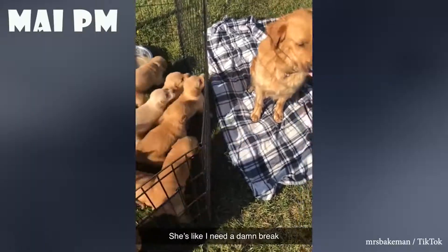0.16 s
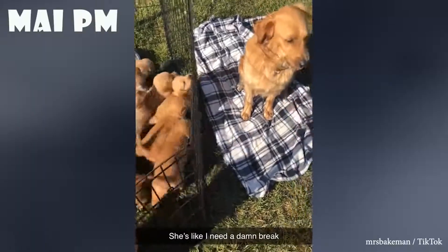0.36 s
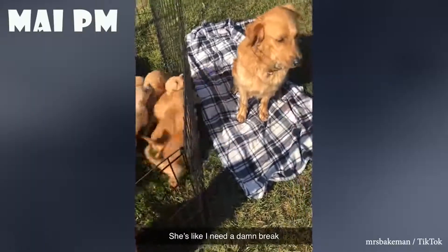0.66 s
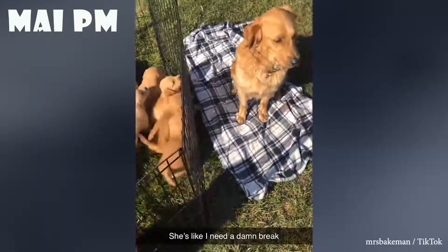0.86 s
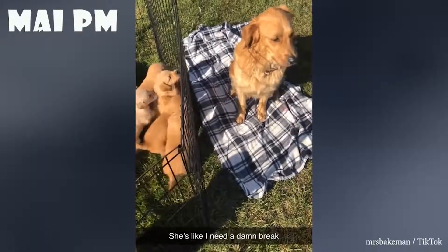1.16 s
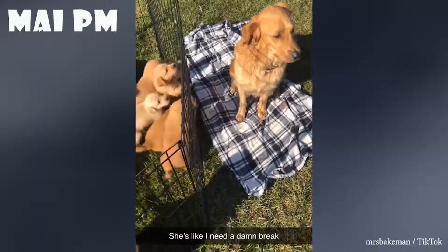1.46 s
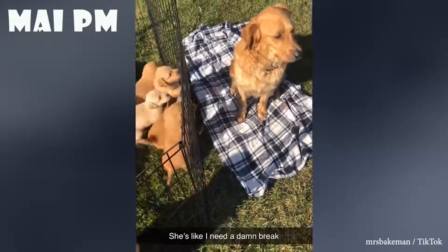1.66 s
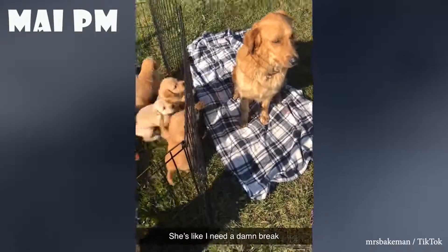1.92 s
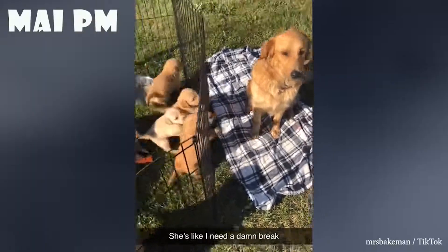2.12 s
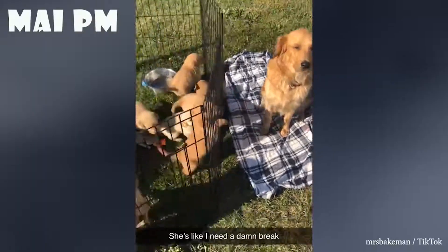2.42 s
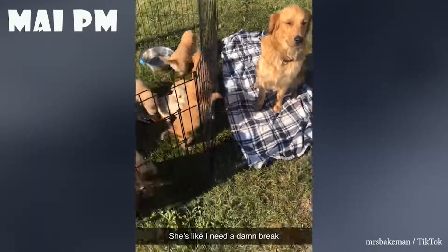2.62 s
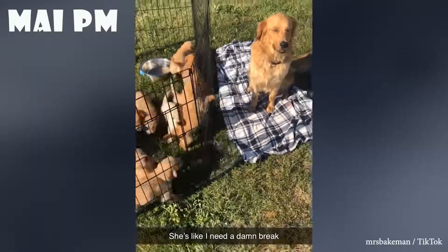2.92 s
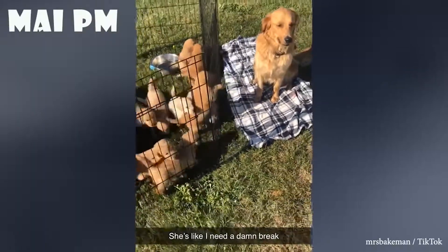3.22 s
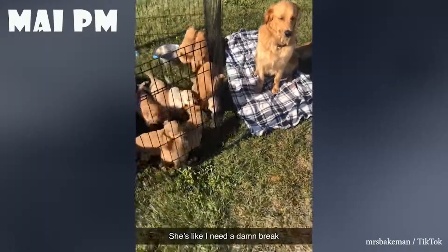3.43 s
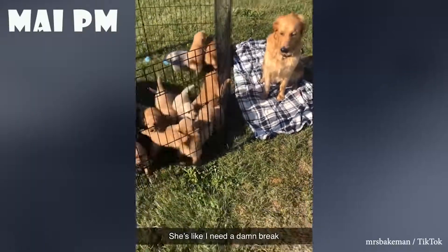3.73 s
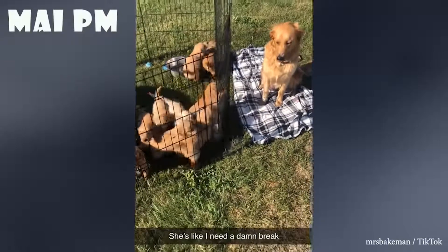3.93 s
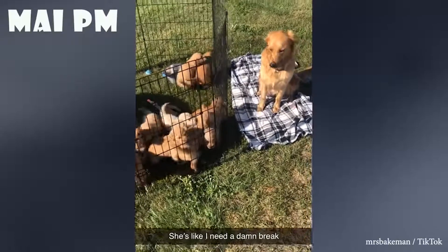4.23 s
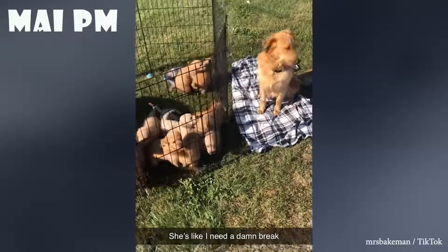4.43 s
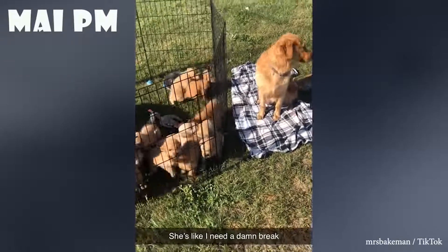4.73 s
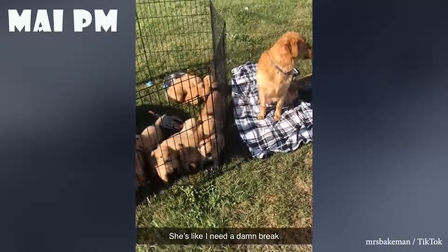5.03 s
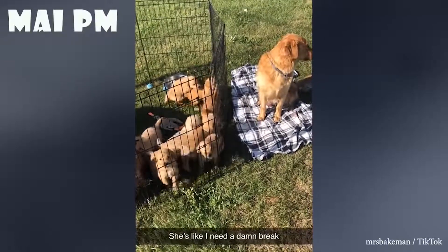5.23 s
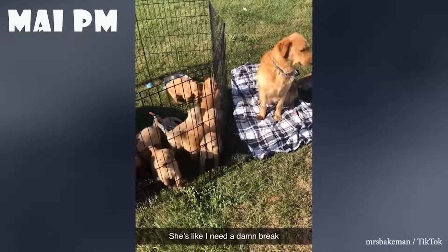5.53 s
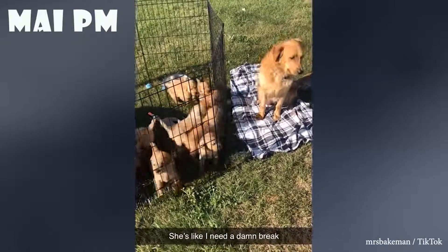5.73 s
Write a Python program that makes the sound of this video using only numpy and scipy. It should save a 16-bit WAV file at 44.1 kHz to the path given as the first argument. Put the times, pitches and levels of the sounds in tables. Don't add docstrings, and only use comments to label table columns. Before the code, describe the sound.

A litter of young puppies whines and squeaks in overlapping high arches outdoors, with light wind on the microphone and a late close dog snort.

```python
import sys
import numpy as np
from scipy import signal
from scipy.io import wavfile
from scipy.ndimage import uniform_filter1d

SR = 44100
rng = np.random.default_rng(int(sys.argv[2]) if len(sys.argv) > 2 else 0)


def volts_from_decibels(level):
    exponent = np.asarray(level, float) / 20
    return 10 ** exponent


def to_wav(s):
    ch = np.atleast_2d(s).T
    pcm = np.round(np.clip(ch, -1, 1) * 32767)
    wavfile.write(sys.argv[1], SR, pcm.astype(np.int16))


N = 258778

# frequency in Hz, density in dB per Hz.
AIR_SPECTRUM = [(120, -10.5), (200, -12.5), (781, -9), (1210, -13), (1660, -16), (2110, -15), (2560, -24),
                (4100, -23), (7000, -29), (13000, -34)]
AIR_DB = -49
# time in seconds, level in dB.
GUSTS = [(0.0, -55), (0.05, -32), (0.29, -42), (0.85, -34.5), (0.93, -52.5), (1.11, -39.5), (1.73, -31.5),
         (2.06, -56), (2.35, -40), (2.45, -56), (2.92, -31), (3.01, -52.5), (4.79, -58), (4.85, -31),
         (4.98, -45), (5.1, -32.5), (5.51, -52.5), (5.87, -46.5)]
# start in seconds, length in seconds, pitch in Hz, level in dB.
BIRD_CHIPS = [
    (0.133, 0.033, 8140, -31.5),
    (2.739, 0.056, 8300, -34),
    (2.809, 0.066, 8200, -34.5),
    (5.582, 0.07, 9430, -41),
    (5.628, 0.088, 7940, -40),
]
# time in seconds, level in dB.
NOSE_BURST = [
    (5.777, -56),
    (5.793, -20.5),
    (5.808, -21),
    (5.868, -28),
]
# time in seconds, treble change in dB.
PHONE_FACING = [
    (.45, 3),
    (.68, 13.5),
    (.75, -8),
    (.95, 3.5),
    (2.3, 3),
    (2.6, -16.5),
    (3.9, -10),
    (4.15, 4.5),
    (4.55, -5.5),
    (4.75, 2),
]

# frequency in Hz, gain in dB.
THROAT_COLOUR = [(2100, 1), (2600, -25.5), (3300, -1), (4000, 0.5), (5000, -4), (6500, -10.5),
                 (8500, -11.5), (10000, -13), (13000, -23)]
# resonance in Hz, width in Hz, gain in dB.
RASP_RESONANCES = [(1250, 530, 7), (1810, 610, 9.5), (4160, 1570, 6.5), (4720, 2200, 2.5)]
# start in seconds, length in seconds, level in dB, slap rate in Hz.
RASP_BREAKS = [(0.754, 0.04, -38, 480), (1.446, 0.035, -39, 500), (1.918, 0.105, -30.5, 590),
               (2.542, 0.045, -30, 510), (2.912, 0.08, -35, 560), (3.03, 0.14, -45, 530),
               (3.335, 0.1, -35.5, 610), (5.652, 0.07, -46, 460), (4.548, .022, -41, 500),
               (4.4, .09, -47, 420), (2.85, .04, -43, 500), (3.69, .04, -42, 600)]

# time in seconds, pitch in Hz, effort in dB.
NEAREST_CRIES = [
    [(.898, 1657, -53), (.94, 1860, -50), (1.075, 1538, -32.5), (1.205, 1340, -48), (1.227, 958, -31)],
    [(2.158, 1075, -72), (2.2, 1172, -21.5), (2.23, 1343, -19.5), (2.269, 1528, -30), (2.365, 1415, -32),
     (2.478, 1272, -33.5)],
    [(2.547, 1008, -30.5), (2.595, 1121, -23), (2.64, 1351, -15.5), (2.67, 1436, -23.5), (2.769, 1275, -22),
     (2.835, 1338, -40.5)],
    [(3.017, 989, -49.5), (3.068, 1057, -25.5), (3.134, 1466, -33), (3.263, 1358, -44.5),
     (3.307, 1430, -44)],
    [(3.658, 988, -37.5), (3.712, 1250, -16), (3.798, 1402, -34.5), (3.84, 1290, -35.5), (3.867, 1076, -34)],
    [(4.49, 900, -55), (4.529, 1130, -32), (4.55, 1247, -29), (4.6, 1423, -40)],
    [(4.59, 1415, -40), (4.65, 1535, -40.5), (4.72, 1648, -34), (4.78, 1636, -35), (4.91, 1356, -42),
     (4.948, 1040, -49)],
    [(4.858, 793, -51), (4.9, 999, -42.5), (5.041, 1195, -32.5), (5.124, 1098, -38), (5.28, 951, -43),
     (5.298, 742, -40.5)],
]
NEAREST_MOUTHS_DB = [-20.5, -17, -10.5, -7.5, -18.5, -2, -6.5, -26]
NEAREST_TILTS_DB = [-8, -4, -2, 2, -4.5, -6.5, -5.5, -6]
# time in seconds, pitch in Hz, effort in dB.
FURTHER_CRIES = [
    [(0, 1466, -23), (.04, 1330, -28.5), (.127, 1366, -32.5), (.144, 1163, -22)],
    [(.248, 952.4, -33), (.329, 1334, -30), (.35, 1413, -30), (.491, 1382, -33.5), (.569, 1237, -47),
     (.59, 1030, -35)],
    [(.44, 1083, -41), (.479, 1381, -26), (.533, 1464, -30), (.641, 1420, -34), (.659, 1180, -25)],
    [(.88, 998, -37.5), (.949, 1249, -36), (.979, 1259, -28.5), (1.093, 1354, -27), (1.182, 1278, -34.5),
     (1.209, 1200, -33)],
    [(1.269, 940, -40), (1.326, 1336, -35.5), (1.359, 1357, -34.5), (1.404, 1520, -28.5),
     (1.47, 1628, -39.5), (1.559, 1588, -37)],
    [(2.029, 1460, -40.5), (2.098, 1563, -42), (2.26, 1614, -46), (2.33, 1387, -43), (2.45, 1360, -43)],
    [(3.307, 952, -49.5), (3.352, 1219, -31), (3.397, 1312, -26.5), (3.445, 1404, -44)],
    [(3.52, 1012, -40), (3.55, 1080, -26), (3.601, 1400, -29), (3.652, 1323, -33.5), (3.718, 1375, -32)],
]
FURTHER_MOUTHS_DB = [-26, -27, -16, -21, -22.5, -5, -9, -15.5]
FURTHER_TILTS_DB = [0.5, 1.5, 1.5, -5, 4, -1.5, -17, -4.5]
# time in seconds, pitch in Hz, effort in dB.
SHARP_CRIES = [
    [(.829, 1046, -42), (.862, 1226, -28.5), (.935, 1585, -28), (.95, 1545, -28), (1.005, 1463, -32),
     (1.02, 1250, -34)],
    [(4.158, 1508, -45), (4.229, 1492, -37), (4.271, 1619, -47), (4.31, 1378, -36), (4.337, 1040, -41)],
    [(5.127, 1071, -35.5), (5.262, 1236, -32), (5.325, 1208, -35.5), (5.39, 1110, -38)],
    [(5.349, 1006, -57), (5.367, 1076, -32.5), (5.442, 1420, -24.5), (5.51, 1295, -26.5),
     (5.528, 1096, -28)],
    [(1.778, 998, -44.5), (1.832, 1218, -24), (1.889, 1599, -31.5), (1.94, 1560, -25.5), (1.999, 1396, -37)],
]
SHARP_MOUTHS_DB = [-17, -18, -21.5, -17.5, -25]
SHARP_TILTS_DB = [1.3, 1.57, 1.7, 4.2, 2]
# time in seconds, pitch in Hz, effort in dB.
FAINTER_CRIES = [
    [(3.95, 854, -56), (4.0, 1050, -45.5), (4.05, 1230, -42)],
    [(4.015, 893, -50), (4.06, 1047, -37.5), (4.1, 1170, -38), (4.16, 1150, -39), (4.2, 975, -43.5),
     (4.215, 903, -40)],
    [(4.04, 1015, -49), (4.09, 1287, -38.5), (4.13, 1500, -39), (4.165, 1560, -43)],
    [(1.96, 1250, -43), (2.0, 1412, -33.5), (2.03, 1614, -36), (2.065, 1580, -55)],
    [(5.615, 298, -46), (5.65, 375, -45.5), (5.69, 463, -42)],
    [(.32, 1170, -49), (.37, 1293, -47), (.45, 1318, -45), (.52, 1284, -44), (.58, 1170, -45)],
    [(3.73, 1025, -46), (3.8, 1109, -45), (3.9, 1118, -43), (3.935, 994, -44)],
]
FAINTER_MOUTHS_DB = [-7.5, -14.5, -7.5, -2.5, -21, -13.5, -9.5]
FAINTER_TILTS_DB = [-1, -8, -4, -6, -7, 0, 6]

# start in seconds, climb in seconds, sag in seconds, top pitch in Hz, effort in dB.
WIDE_CALLS = [
    (2.93, 0.048, 0.074, 1410, -47),
    (3.72, 0.075, .15, 1500, -47.5),
    (3.8, 0.052, 0, 1500, -59),
    (5.63, 0.06, 0.12, 940, -48),
    (1.3, .04, 0.047, 1158, -53),
    (2.45, .07, 0.076, 1046, -46.5),
    (3.308, 0.042, 0.018, 1173, -41),
]
# start, climb and sag in seconds, top pitch in Hz, effort in dB.
OPEN_CALLS = [ (.15, 0.096, 0.052, 1290, -38), (1.018, 0.0016, 0.073, 1760, -43),
              (1.38, 0.17, 0.18, 1572, -35.5), (1.449, 0.086, 0.14, 1364, -48.5),
              (1.64, 0.031, 0.11, 1503, -39.5), (2.649, 0.062, 0.046, 1152, -35.5),
              (2.73, 0.023, 0.096, 1570, -40), (2.778, 0.048, 0.058, 1120, -39.5),
              (2.84, 0, .11, 1192, -37.5), (2.9, 0.043, 0.029, 1250, -39),
              (3.358, 0.091, 0.086, 1178, -40.5), (3.445, 0.048, 0.044, 967, -40),
              (3.747, 0, 0.11, 1230, -43), (5.01, 0.06, 0.085, 1406, -34), (4.15, 0.048, 0.033, 1235, -33),
              (1.03, 0.083, 0, 1364, -31.5), (4.409, 0.068, 0.027, 1216, -34.5),
              (4.678, 0.048, 0.1, 1317, -35), (5.715, 0.12, 0.16, 1357, -30.5)]
# start, climb and sag in seconds, top pitch in Hz, effort in dB.
HALF_CALLS = [ (.709, 0.15, 0.09, 1537, -33), (.769, 0.02, 0.023, 1270, -30),
              (1.218, 0.096, 0.094, 1627, -32), (1.539, 0.035, .09, 1558, -29.5),
              (1.91, 0.088, 0.0014, 1329, -25), (2.029, 0.00062, 0.034, 1250, -26),
              (2.029, 0.0071, 0.068, 1320, -43.5), (2.278, 0.05, 0.017, 1312, -37.5),
              (2.41, 0.11, 0.054, 1258, -38.5), (3.08, 0.094, 0.027, 869, -40),
              (4.038, 0.049, 0.011, 1207, -28), (4.17, 0.036, 0.0098, 1249, -33.5),
              (4.358, 0.07, 0.028, 1392, -39.5)]
# start, climb and sag in seconds, top pitch in Hz, effort in dB.
SHUT_CALLS = [ (0, 0.014, 0.084, 1242, -37.5), (.3, 0, 0.062, 900, -44), (.198, 0.027, 0.057, 1100, -39),
              (.389, 0.07, 0.0091, 1345, -33), (.518, 0.064, 0.12, 1073, -40),
              (.87, 0.017, 0.036, 685, -46), (.935, 0, 0.04, 675, -48), (.65, 0.045, 0.0012, 1450, -37),
              (1.149, 0, 0.021, 1250, -25), (1.329, 0.039, 0.029, 1053, -38),
              (1.559, 0.049, 0.012, 1173, -33.5), (1.607, 0.072, 0, 1053, -34.5),
              (2.107, 0.17, 0.015, 1504, -30.5), (2.209, 0.00086, 0.034, 1215, -28.5),
              (2.38, 0, 0.0164, 1435, -18), (3.759, 0.011, 0.042, 914, -42),
              (3.978, 0.13, .05, 1490, -43.5), (4.559, 0.036, 0.15, 1165, -36.5),
              (5.439, 0.063, .033, 970, -50.5), (5.55, 0.075, 0.007, 722, -41.5),
              (5.537, 0.082, 0.027, 1504, -43)]
WIDE_DB, OPEN_DB, HALF_DB, SHUT_DB = -4, -15, -21, -28.5
CLIMB_SHARE, CLIMB_S, CLIMB_BEND = 0.42, 0.09, 1.5
SAG_PER_S, SLUMP_SHARE, SLUMP_S = 0.65, 0.171, 0.023
ONSET_DB, ONSET_S, TIRE_DB_PER_S = -11, 0.023, -19.5
NOSE_HZ, NOSE_WIDTH_HZ, NOSE_DB = 1304, 136, 5
# start in seconds, length in seconds, pitch in Hz, level in dB.
FALLING_YELPS = [
    (1.148, 0.018, 1000, -51),
    (1.206, 0.022, 1110, -42),
    (2.046, 0.02, 1140, -43),
    (2.381, 0.02, 1230, -38),
    (2.436, 0.013, 1350, -28),
    (2.484, 0.0225, 1200, -42),
    (4.287, .03, 1570, -40.5),
    (1.658, .02, 1130, -43),
    (.078, 0.02, 1200, -38.5),
]
YELP_FALL, YELP_MOUTH_DB, YELP_TILT_DB = 0.2, -17, -11


def evened(x):
    return x / np.sqrt(np.mean(x ** 2) + 1e-20)


def read(points, hz):
    f, value = np.transpose(points)
    return np.interp(np.log(hz + 1), np.log(f + 1), value)


def add(mix, s, sound):
    part = mix[max(round(s * SR), 0):][:len(sound)]
    part += sound[:len(part)]


def band(x, lo_hz, hi_hz):
    return signal.sosfilt(signal.butter(2, [lo_hz, hi_hz], "band", fs=SR, output="sos"), x)


def smooth2d(x, rows, columns):
    return uniform_filter1d(uniform_filter1d(x, size=rows, axis=0), size=columns, axis=1)


def drift(count, size):
    return evened(uniform_filter1d(uniform_filter1d(rng.standard_normal(count), size), size))


def resonate(x, hz, width_hz):
    b, a = signal.iirpeak(hz, hz / width_hz, fs=SR)
    return signal.lfilter(b, a, signal.lfilter(b, a, x))


def air():
    frames, hz = N // 256 + 5, np.fft.rfftfreq(1024, 1 / SR)
    gust_db = np.interp(np.arange(frames) * 256 / SR, *np.transpose(GUSTS))
    real, imaginary, patches = rng.standard_normal((frames, 513, 3)).T
    patches = evened(smooth2d(patches, 14, 12))
    level_db = read(AIR_SPECTRUM, hz)[:, None] + 5.5 * patches - 0.15 * gust_db
    z = (real + 1j * imaginary) * volts_from_decibels(level_db)
    return volts_from_decibels(AIR_DB) * evened(signal.istft(z, nperseg=1024, noverlap=768)[1][:N])


def wind():
    noise = rng.standard_normal(N)
    flap = band(band(noise, 47, 131), 47, 131)
    rumble = evened(band(noise, 35, 70)) + volts_from_decibels(-13) * evened(flap)
    gust_db = np.interp(np.arange(N) / SR, *np.transpose(GUSTS))
    return volts_from_decibels(gust_db + 4.44 * drift(N, size=1300)) * evened(rumble)


def chip(length, hz, db):
    t = np.arange(round(length * SR)) / SR
    glide = hz * (1 + 0.127 * np.exp(-t / 0.0048) + 0.5 * t)
    return volts_from_decibels(db) * np.sin(2 * np.pi * np.cumsum(glide) / SR) * signal.windows.tukey(len(t), 0.4)


def bird():
    out = np.zeros(N)
    for s, length, hz, db in BIRD_CHIPS:
        add(out, s, chip(length, hz, db))
    return out


def snort():
    out, t = np.zeros(N), np.arange(5000) / SR
    turn = 2 * np.pi * np.cumsum(262 + 40 * np.exp(-t / 0.01)) / SR
    swell = np.exp(-(t / 0.02) ** 2) + 0.24 * np.exp(-((t - 0.06) / 0.021) ** 2)
    swell = np.minimum(t / 0.013, 1) * swell
    add(out, 5.75, volts_from_decibels(-12) * swell * (np.sin(turn) + 0.16 * np.sin(2 * turn)))
    s, db = np.transpose(NOSE_BURST)
    noise = rng.standard_normal(N) * volts_from_decibels(2.3 * drift(N, size=60))
    nose = band(noise, 2930, 10400) + 2.66 * band(noise, 300, 780)
    nose += 0.52 * band(noise, 1720, 3300) + 2 * resonate(noise, 5390, 410)
    return out + volts_from_decibels(np.interp(np.arange(N) / SR, s, db, left=-120)) * evened(nose)


def murmur():
    out = np.zeros(N)
    for s, hz, length, db in rng.uniform([0, 850, 0.03, -56], [5.7, 1350, 0.09, -47], (45, 4)):
        rows = [(s, hz, db), (s + length / 2, 1.1 * hz, db), (s + length, 0.8 * hz, db)]
        add(out, s, whine(rows, -19, -5))
    return out


def ground_echo(litter):
    scatter = rng.standard_normal(4000) * volts_from_decibels(-60 * np.arange(4000) / SR / 0.1)
    return volts_from_decibels(-21) * signal.oaconvolve(litter, scatter / np.linalg.norm(scatter))[:N]


def rasp(length, db, slap_hz):
    count = round(length * SR)
    rate = slap_hz * (1 + 0.6 * np.arange(count) / SR + 0.035 * drift(count, size=70))
    turn = 2 * np.pi * np.cumsum(rate) / SR
    slaps = sum(volts_from_decibels(4 * drift(count, size=500)) * np.cos(k * turn + k * k) for k in range(1, 12))
    puffs = (evened(slaps) + 0.7 * rng.standard_normal(count)) * volts_from_decibels(3 * drift(count, size=120))
    throat = sum(volts_from_decibels(gain_db) * resonate(puffs, hz, width_hz) for hz, width_hz, gain_db in RASP_RESONANCES)
    rough = band(band(throat + 0.027 * puffs, 330, 6000), 290, 6000)
    return volts_from_decibels(db) * evened(rough) * np.hanning(count) ** 0.8


def break_voices(litter):
    for s, length, db, slap_hz in RASP_BREAKS:
        voiced = litter[round(s * SR):][:round(length * SR)]
        smear = 0.3 * voiced * drift(len(voiced), size=50) * np.hanning(len(voiced))
        add(litter, s, rasp(length, db, slap_hz) + smear)


def arch(start, climb, sag, top_hz, effort_db):
    climb, sag = max(climb, 0), max(sag, 0)
    t = np.linspace(0, climb + sag, num=40)
    to_top = np.clip(1 - t / (climb + 1e-9), 0, 1)
    below = CLIMB_SHARE * (1 - np.exp(-climb / CLIMB_S)) * to_top ** CLIMB_BEND
    after = np.maximum(t - climb, 0)
    at_end = np.exp(-((climb + sag - t) / SLUMP_S) ** 2 * 2)
    slump = SLUMP_SHARE * np.minimum(after / SLUMP_S, 1) * at_end
    hz = top_hz * (1 - below - SAG_PER_S * after - slump)
    ring_db = NOSE_DB * np.exp(-((hz - NOSE_HZ) / NOSE_WIDTH_HZ) ** 2)
    effort_db = effort_db + ring_db + ONSET_DB * np.exp(-t / ONSET_S) + TIRE_DB_PER_S * t
    return np.transpose([start + t, hz, effort_db])


def whine(rows, mouth_db, tilt_db, fade_s=0.013):
    s, hz, effort_db = np.transpose(rows)
    t = np.arange(s[0], s[-1], 1 / SR)
    hz = uniform_filter1d(np.interp(t, s, hz), size=450, mode="nearest")
    hz = hz * (1 + 0.0047 * drift(len(t), size=300))
    effort_db = np.interp(t, s, effort_db) + 1.51 * drift(len(t), size=250)
    mouth_db = mouth_db + 2.6 * np.linspace(1, -1, len(t)) + 0.063 * (effort_db - effort_db.mean())
    turn = 2 * np.pi * (np.cumsum(hz) / SR + rng.random())
    facing_db = np.interp(t, *np.transpose(PHONE_FACING))
    climb_db = np.clip(np.gradient(hz) * SR / 400, 0, 12)
    voice = np.cos(turn)
    for k in range(2, 11):
        flutter_db = (2 + 0.3 * k) * drift(len(t), size=700)
        top = np.clip((k * hz - 6000) / 1500, 0, 1)
        dull_db = top * (0.31 * (mouth_db + 7) - facing_db + climb_db)
        dull_db -= (1 - top) * tilt_db * min(k - 3, 2)
        level_db = mouth_db + read(THROAT_COLOUR, k * hz) - dull_db + flutter_db
        voice += volts_from_decibels(level_db) * np.cos(k * turn + k * k + 0.03 * k * drift(len(t), size=120))
    hiss_db = -27 + 5 * drift(len(t), size=1500) + facing_db - 0.3 * (effort_db + 30)
    nasal_hiss = volts_from_decibels(hiss_db) * band(rng.standard_normal(len(t)), 4270, 12500)
    hoarse_edge = volts_from_decibels(mouth_db - 12) * band(rng.standard_normal(len(t)), 1700, 6000)
    fade = np.clip(np.minimum(t - s[0], s[-1] - t) / fade_s, 0, 1)
    return np.sqrt(2) * volts_from_decibels(effort_db) * fade * (voice + nasal_hiss + hoarse_edge)


def chorus():
    out = murmur()
    for cries, mouths_db, tilts_db in ((NEAREST_CRIES, NEAREST_MOUTHS_DB, NEAREST_TILTS_DB),
                                       (FURTHER_CRIES, FURTHER_MOUTHS_DB, FURTHER_TILTS_DB),
                                       (SHARP_CRIES, SHARP_MOUTHS_DB, SHARP_TILTS_DB),
                                       (FAINTER_CRIES, FAINTER_MOUTHS_DB, FAINTER_TILTS_DB)):
        for rows, mouth_db, tilt_db in zip(cries, mouths_db, tilts_db):
            add(out, rows[0][0], whine(rows, mouth_db, tilt_db))
    for calls, mouth_db in ((WIDE_CALLS, WIDE_DB), (OPEN_CALLS, OPEN_DB),
                            (HALF_CALLS, HALF_DB), (SHUT_CALLS, SHUT_DB)):
        for call in calls:
            add(out, call[0], whine(arch(*call), mouth_db, -1.06))
    for s, length, hz, db in FALLING_YELPS:
        rows = [(s, hz, db), (s + length, (1 - YELP_FALL) * hz, db)]
        add(out, s, whine(rows, YELP_MOUTH_DB, YELP_TILT_DB, fade_s=0.003))
    return out


def scene():
    litter = chorus()
    break_voices(litter)
    litter = litter + ground_echo(litter)
    return (litter + bird() + air() + wind() + snort())[None]


def roll_off(x):
    return signal.sosfilt(signal.butter(12, 13790, fs=SR, output="sos"), x)


def record(dry):
    return roll_off(dry)


dry = scene()
out = record(dry)
to_wav(out)
```